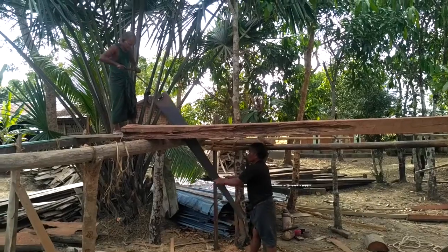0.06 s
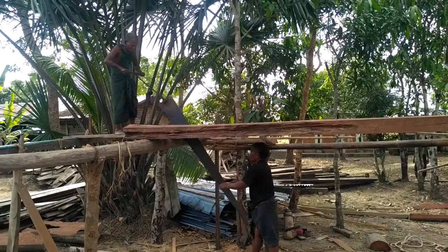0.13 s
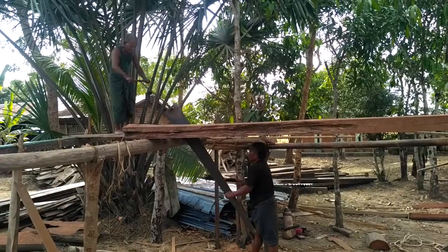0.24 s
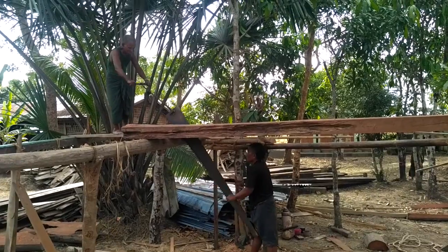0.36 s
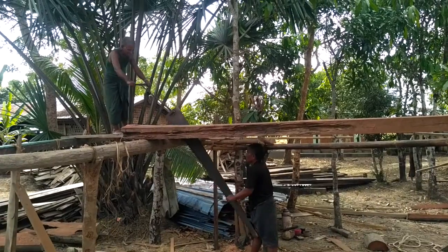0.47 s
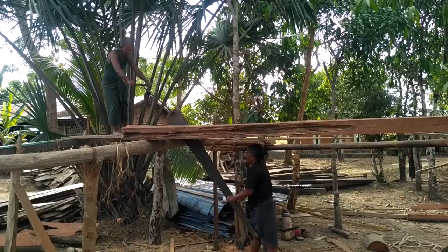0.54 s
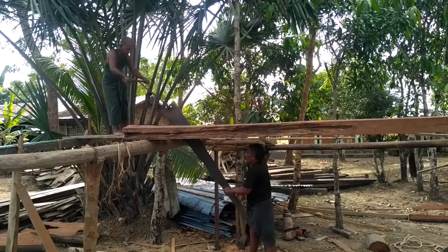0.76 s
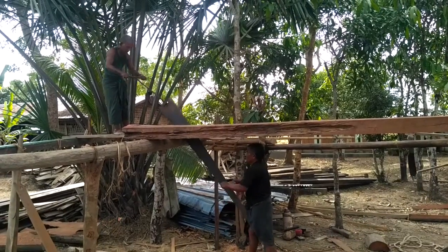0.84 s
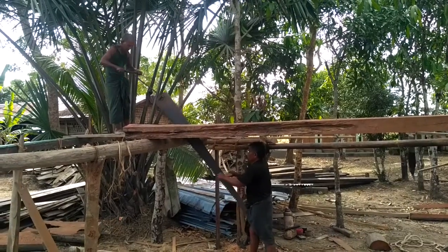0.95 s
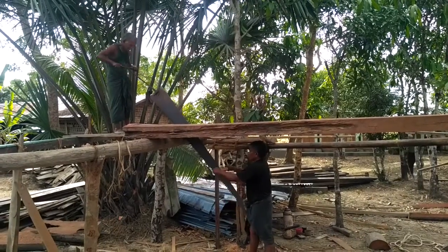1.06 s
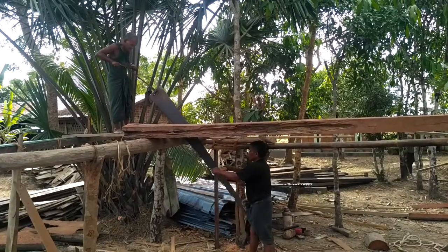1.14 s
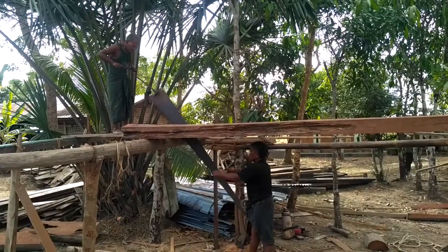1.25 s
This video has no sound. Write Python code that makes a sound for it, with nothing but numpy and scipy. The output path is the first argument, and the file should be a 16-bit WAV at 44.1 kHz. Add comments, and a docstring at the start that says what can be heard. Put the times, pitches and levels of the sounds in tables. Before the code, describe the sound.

Sawing by hand in an open yard: the long blade knocks lightly, rasps through timber in one bright, juddering cut, pauses briefly and slides back more quietly with small ticks and faint squeaks.

```python
"""A faint slide of steel over a low rumble, then one loud cutting stroke and a softer return:
two people work a long pit saw through a beam outdoors. On the cut the blade knocks, and the teeth
bite in judders and snap wood fibres, which ring in the steel and the timber. On the return the teeth
only rub and tick in the kerf. Stick-slip adds faint squeaks; the yard scatters short echoes."""
import sys
import numpy as np
from scipy import signal
from scipy.fft import rfft, irfft
from scipy.io import wavfile
from scipy.ndimage import uniform_filter1d

SR = 44100
rng = np.random.default_rng(int(sys.argv[2]) if len(sys.argv) > 2 else 0)


def materialize(psi):
    """Save the field psi as 16-bit PCM at rate SR to the path in sys.argv[1].

    A 1-D psi becomes a single channel; in a 2-D psi each row is a channel.
    """
    bounded = np.clip(np.atleast_2d(psi).T, -1, 1)
    quanta = np.round(bounded * 32767).astype(np.int16)
    wavfile.write(sys.argv[1], SR, quanta)


N = 57330
T = np.arange(N) / SR

# loaded timber, broad spectrum: freq_hz, density_db
TIMBER_SPECTRUM = [(60, -22), (130, -10.5), (200, -7.5), (280, -6), (450, -3.5), (750, -3.5), (1100, 0.5),
                   (1450, 1.5), (1950, -1.5), (2400, -1), (3100, -7), (5000, -6.5)]
# loaded timber, resonances: freq_hz, width_hz, gain_db
TIMBER_MODES = [(375, 30, -1), (530, 35, -3), (689, 25, 0), (1070, 35, -1), (1195, 30, 0), (1262, 25, -1),
                (1432, 22, 0), (1503, 18, 6), (1637, 18, 0), (1805, 35, 0), (1884, 20, -2), (2210, 50, 0),
                (2495, 30, 0), (2719, 22, 0)]


def from_db(db):
    """Decibels to gain."""
    return 10 ** (np.asarray(db) / 20)


def rms_one(x):
    """Scale to unit power."""
    return x / np.sqrt(np.mean(x ** 2) + 1e-20)


def evened(x, window_samples):
    """Hold the running power near one."""
    x = rms_one(x)
    return x / np.sqrt(uniform_filter1d(x ** 2, size=window_samples) + 1e-4)


def levels_db(rows):
    """Level columns at every sample, falling 300 dB/s beyond the ends."""
    times_s, *columns = np.transpose(rows)
    outside_s = np.maximum(times_s[0] - T, 0) + np.maximum(T - times_s[-1], 0)
    return [np.interp(T, times_s, column) - 300 * outside_s for column in columns]


def decay(start_s, t60_s):
    """Sudden start, exponential decay."""
    return (T >= start_s) * np.exp(-np.log(1000) * np.maximum(T - start_s, 0) / t60_s)


def colour(x, spectrum):
    """Give an excitation a broad spectrum."""
    freq_hz, density_db = np.transpose(spectrum)
    bins_hz = np.maximum(np.arange(N // 2 + 1) * SR / N, 1)
    gain_db = np.interp(np.log(bins_hz), np.log(freq_hz), density_db)
    return irfft(rfft(x) * from_db(gain_db), N)


def resonance(x, freq_hz, width_hz):
    """Two-pole resonator, unit peak gain."""
    radius = np.exp(-np.pi * width_hz / SR)
    feedforward = np.array([1, 0, -1]) * (1 - radius ** 2) / 2
    feedback = [1, -2 * radius * np.cos(2 * np.pi * freq_hz / SR), radius ** 2]
    return signal.lfilter(feedforward, feedback, x + 1e-18)


def body(force, spectrum, modes):
    """Response to a force: broad colour plus narrow resonances, unit power."""
    rings = sum(from_db(gain_db) * resonance(force, hz, width_hz) for hz, width_hz, gain_db in modes)
    return rms_one(colour(force + rings, spectrum))


def fibres(snaps_per_s, spread_db, hiss_db):
    """Tiny snaps of uneven size over smooth friction."""
    sizes = from_db(spread_db * np.minimum(rng.exponential(1, N), 4)) * rng.choice([-1, 1], N)
    snaps = rms_one(sizes * (rng.random(N) < snaps_per_s / SR))
    return snaps + from_db(hiss_db) * rng.standard_normal(N)


def sliding():
    """The unloaded blade rubs the timber, around the cut and on the return."""
    # time_s, blade_db, timber_db
    around_cut = [(0, -68, -57.5), (.085, -65, -61.5), (.13, -53.5, -59), (.17, -68, -62), (.22, -64, -56),
                  (.52, -45, -64.5), (.6, -46, -61.5), (.66, -55.5, -69.5), (.7, -68, -82.5),
                  (.73, -81, -73)]
    return_stroke = [(.805, -76, -80), (.838, -47.5, -73), (.874, -46, -51), (.915, -41.5, -51.5),
                     (.934, -39.5, -41.5), (1.0, -36, -38.5), (1.11, -39, -41), (1.17, -37, -40),
                     (1.24, -42, -44), (1.268, -45.5, -46.5), (1.3, -56, -54)]
    # broad spectra: freq_hz, density_db
    blade_spectrum = [(2000, -17.5), (3400, -17.5), (4000, -13.5), (4800, -6), (6000, -8), (8000, -2),
                      (9200, 0.5), (10200, -3), (11700, 2.5), (12900, -1.5), (13900, -3.5), (14700, -12.5),
                      (15600, -12.5)]
    timber_spectrum = [(100, -32), (200, -34), (290, -3.5), (480, -1.5), (660, -1.5), (880, -2), (1150, -2),
                       (1500, -4), (2100, -8), (2700, -7.5), (3300, -17), (5000, -17)]
    # unloaded resonances: freq_hz, width_hz, gain_db
    blade_modes = [(2095, 30, 6), (11420, 90, -5), (11840, 80, -3), (13780, 220, -1)]
    timber_modes = [(285, 25, -2), (365, 22, 2), (505, 25, -2), (673, 20, 2), (728, 18, -2), (1141, 35, 1),
                    (1205, 25, -3), (1680, 40, -3), (2095, 30, 7)]
    blade_db, timber_db = np.maximum(levels_db(around_cut), levels_db(return_stroke))
    force = fibres(snaps_per_s=9100, spread_db=2.0, hiss_db=1.5)
    blade = from_db(blade_db - 1.74) * body(force, blade_spectrum, blade_modes)
    timber = from_db(timber_db - 0.6) * body(force, timber_spectrum, timber_modes)
    return blade + timber


def rumble():
    """A low shudder, probably of the beam on its frame."""
    # time_s, level_db
    envelope = [(0, -59.5), (.06, -51.5), (.16, -43.5), (.2, -47), (.29, -42), (.38, -51), (.48, -47.5),
                (.58, -59), (.75, -65), (.95, -61.5), (1.11, -70), (1.17, -51.5), (1.24, -45.5), (1.3, -55)]
    # freq_hz, density_db
    spectrum = [(20, -32.5), (38, -19.5), (55, -6), (83, -3.5), (108, -2.5), (150, -16), (220, -16),
                (400, -33.5), (1000, -75.5)]
    # freq_hz, width_hz, gain_db
    modes = [(79.6, 10, 3)]
    level_db, = levels_db(envelope)
    shudder = body(rng.standard_normal(N), spectrum, modes)
    return from_db(level_db) * evened(shudder, window_samples=2200)


def air():
    """Still outdoor air: faint, steady, dark noise."""
    # freq_hz, density_db
    spectrum = [(30, -15.5), (100, 3), (300, -16.5), (1200, -14), (3000, -24), (8000, -27), (16000, -22)]
    return from_db(-72) * rms_one(colour(rng.standard_normal(N), spectrum))


def squeaks():
    """The blade sticks and slips: narrow, wavering tones that rise, hold and fade."""
    # start_s, pitch_hz, level_db, hold_s
    slips = [(.058, 6830, -63, 0.018), (0.183, 863, -53.5, 0.11), (0.929, 1805, -45, 0.0088),
             (0.988, 282, -44.5, 0.012), (0.995, 2096, -46, .022)]
    width_hz, rise_db_per_s, fall_db_per_s = 52, 1503, 399
    out = np.zeros(N)
    for start_s, pitch_hz, level_db, hold_s in slips:
        band = resonance(rng.standard_normal(N), pitch_hz, width_hz)
        tone = evened(resonance(band, pitch_hz, width_hz), window_samples=1100)
        fade_in_db = rise_db_per_s * np.maximum(start_s - T, 0)
        fade_out_db = fall_db_per_s * np.maximum(T - start_s - hold_s, 0)
        out += tone * from_db(level_db - fade_in_db - fade_out_db)
    return out


def cutting_stroke():
    """The teeth tear fibres, surging at every bite; blade and timber ring."""
    # time_s, blade_db, timber_db
    stroke = [(.17, -62.5, -62.5), (.204, -45.5, -54), (.228, -33.5, -46), (.238, -29, -41),
              (.29, -24.5, -36.5), (.36, -19, -32.5), (.44, -18, -30.5), (.505, -24.5, -35),
              (.545, -38, -42.5), (.595, -52, -56.5), (.665, -67, -76), (.725, -85.5, -87)]
    # start_s, boost_db
    bites = [(0.229, 6.5), (.263, 7.5), (0.292, 7.5), (0.327, 5.5), (.349, 1.5), (0.362, 3.5), (.411, 7),
             (0.428, 5), (0.462, 3)]
    # loaded blade, broad spectrum: freq_hz, density_db
    blade_spectrum = [(2000, -35.5), (3200, -22.5), (4100, -16.5), (6800, -18.5), (8000, -9.5), (9100, -5),
                      (10200, -9.5), (11100, -2), (12000, -2), (12600, -3), (14000, -2.5), (14600, -23),
                      (15700, -6.5)]
    # loaded blade, resonances: freq_hz, width_hz, gain_db
    blade_modes = [(4118, 40, 2), (8480, 70, -3), (8670, 30, -2), (9055, 35, -1), (9480, 90, -3),
                   (10799, 20, 3), (11092, 35, 2), (11503, 16, 7), (11755, 25, -1), (12010, 25, 2),
                   (12140, 30, 1), (12385, 18, -1), (12796, 22, 0), (13200, 20, 4), (13595, 25, -1),
                   (14017, 22, 2), (14082, 25, 3), (14145, 35, 1)]
    rise_s, hold_s, fall_s = 0.0058, 0.0067, 0.011
    corners_s = np.cumsum([0, rise_s, hold_s, fall_s])
    bite_db = sum(boost_db * np.interp(T - start_s, corners_s, [0, 1, 1, 0])
                  for start_s, boost_db in bites)
    blade_db, timber_db = levels_db(stroke)
    force = fibres(snaps_per_s=7000, spread_db=1.5, hiss_db=-4)
    blade = from_db(blade_db + bite_db - 1.47) * body(force, blade_spectrum, blade_modes)
    timber = from_db(timber_db + 0.66 * bite_db + 1.78) * body(force, TIMBER_SPECTRUM, TIMBER_MODES)
    return blade + timber


def knock():
    """The blade takes up its load and sets the timber ringing."""
    ring = body(rng.standard_normal(N), TIMBER_SPECTRUM, TIMBER_MODES)
    return from_db(-47.5) * decay(start_s=0.172, t60_s=0.15) * ring


def ticks():
    """Single teeth catch in the kerf: short bursts, each in its own band."""
    # start_s, level_db, low_hz, high_hz, t60_s
    catches = [(0.1757, -45.5, 353, 14500, .075), (.6672, -38, 5560, 10800, .006),
               (0.738, -69, 3300, 9000, .02), (1.1305, -28.5, 12900, 14500, .018),
               (1.174, -29.5, 11300, 14500, .02), (1.180, -27, 11400, 14500, 0.019),
               (1.228, -29, 11500, 14400, 0.025)]
    out = np.zeros(N)
    for start_s, level_db, low_hz, high_hz, t60_s in catches:
        band = signal.butter(3, [low_hz, high_hz], "band", fs=SR, output="sos")
        makeup_gain = np.sqrt(SR / 2 / (high_hz - low_hz))
        burst = rng.standard_normal(N) * decay(start_s, t60_s) * makeup_gain
        out += from_db(level_db) * signal.sosfilt(band, burst + 1e-18)
    return out


def yard(x):
    """Sparse, short reflections from the frame, wood piles and trees."""
    echoes_per_s, gap_s = 1500, 0.004
    echoes = rng.standard_normal(N) * (rng.random(N) < echoes_per_s / SR)
    echoes *= (T > gap_s) * decay(start_s=0, t60_s=0.16)
    echoes /= np.sqrt(np.sum(echoes ** 2))
    return from_db(-12) * signal.fftconvolve(x, echoes)[:N]


def scene():
    """The saw in the open yard, mono."""
    saw = cutting_stroke() + sliding() + ticks() + knock() + squeaks()
    return (air() + saw + yard(saw) + rumble())[None]


def record(dry):
    """Steep low-pass on the top treble."""
    cutoff_hz = 15700
    return signal.sosfilt(signal.ellip(12, .2, 80, cutoff_hz, fs=SR, output="sos"), dry)


dry = scene()
out = record(dry)
materialize(out)
```